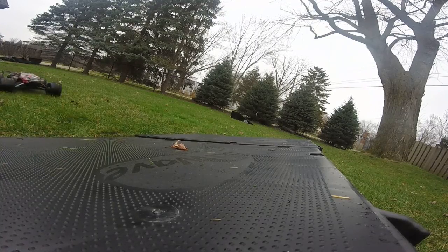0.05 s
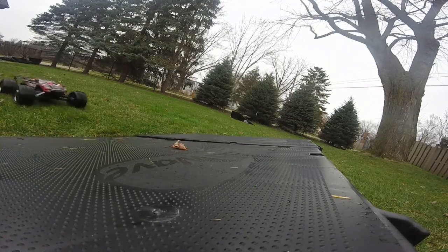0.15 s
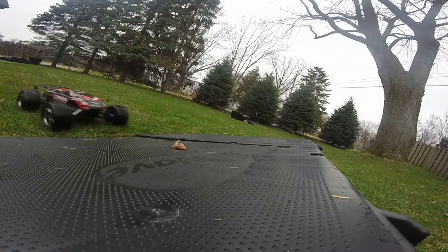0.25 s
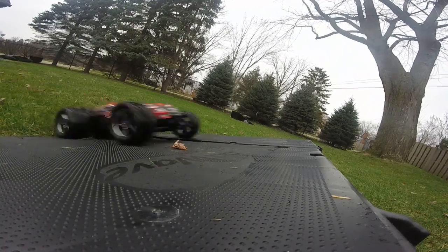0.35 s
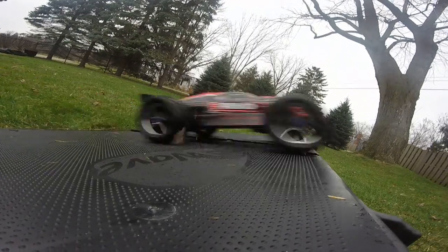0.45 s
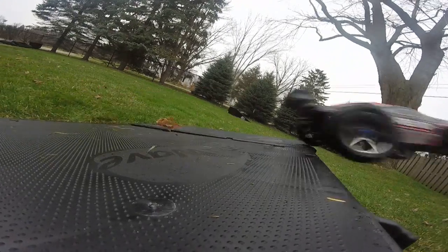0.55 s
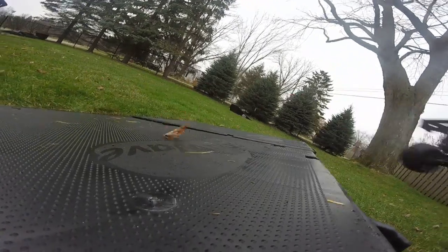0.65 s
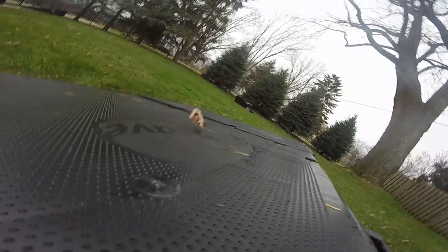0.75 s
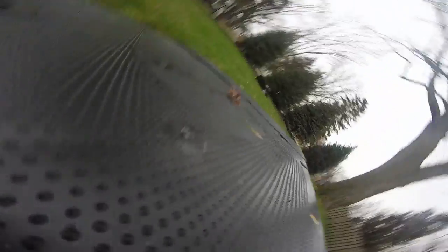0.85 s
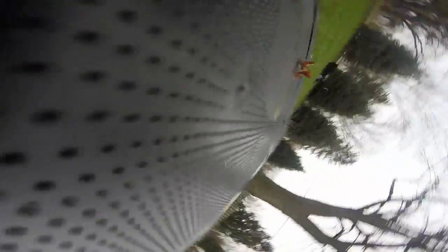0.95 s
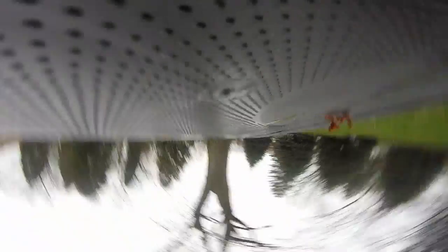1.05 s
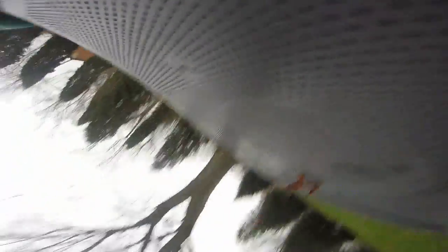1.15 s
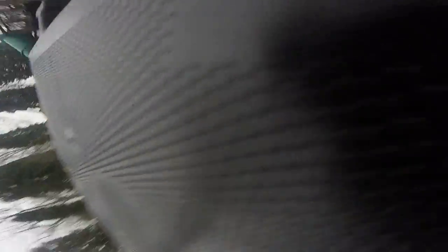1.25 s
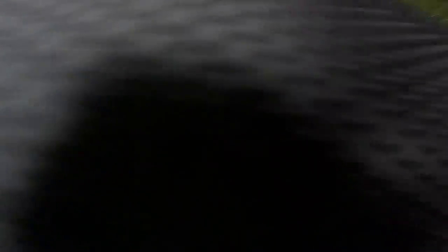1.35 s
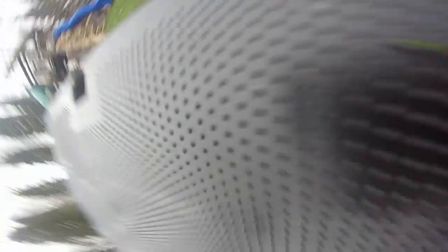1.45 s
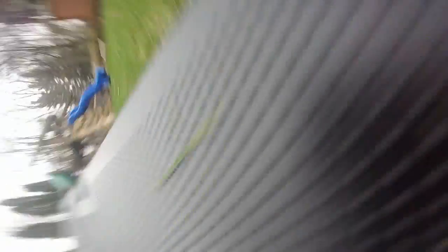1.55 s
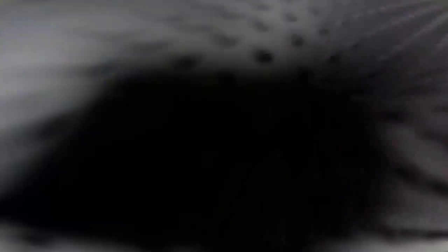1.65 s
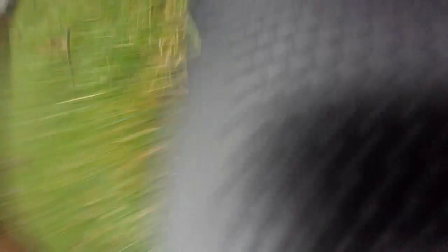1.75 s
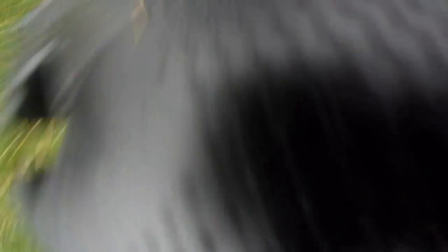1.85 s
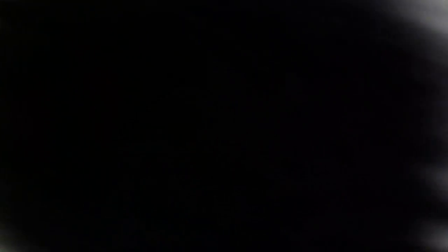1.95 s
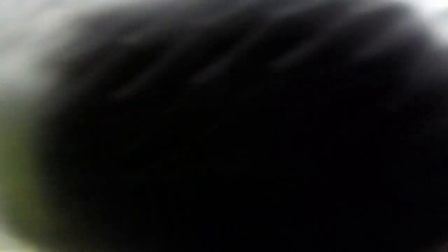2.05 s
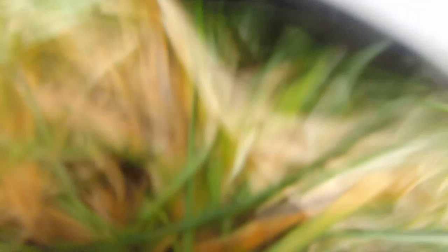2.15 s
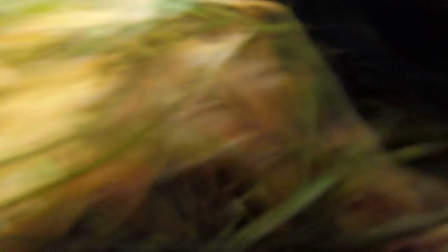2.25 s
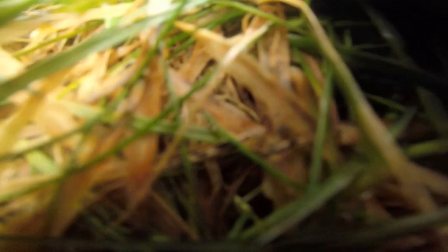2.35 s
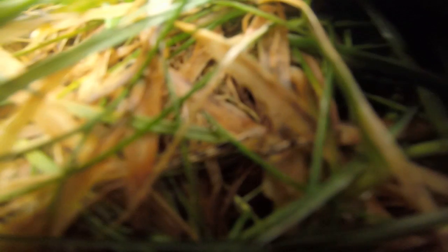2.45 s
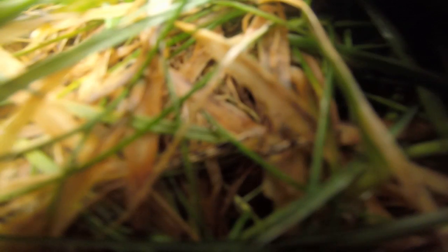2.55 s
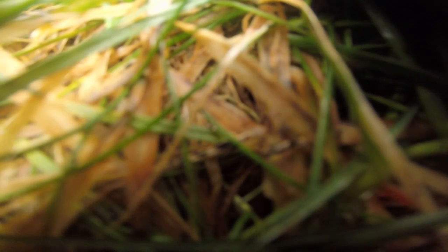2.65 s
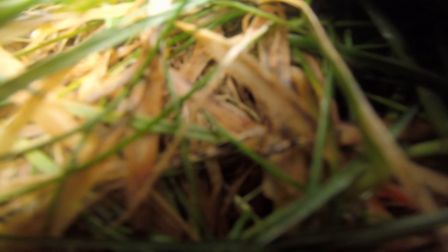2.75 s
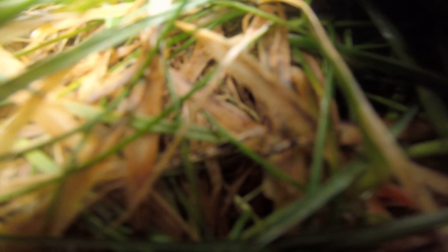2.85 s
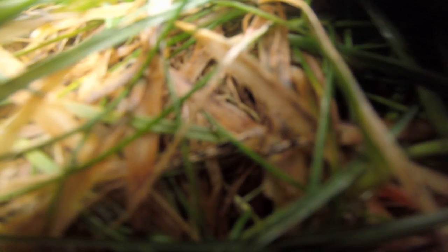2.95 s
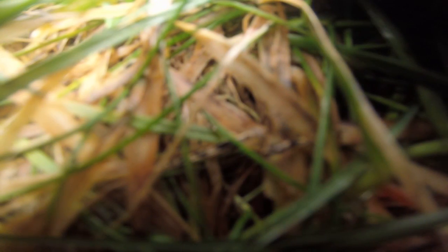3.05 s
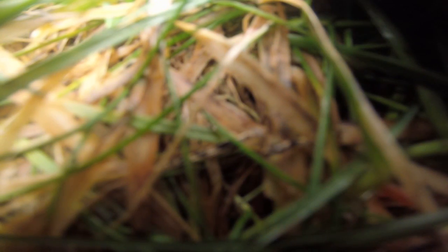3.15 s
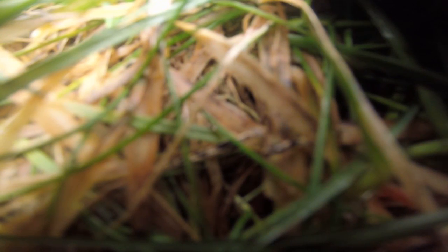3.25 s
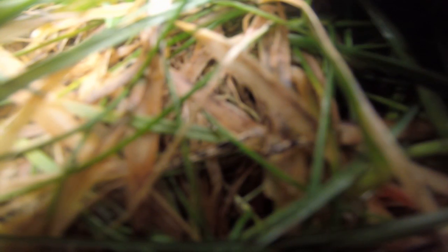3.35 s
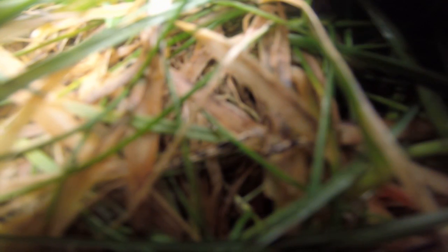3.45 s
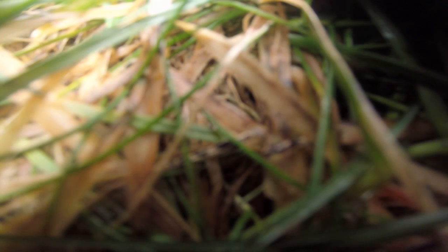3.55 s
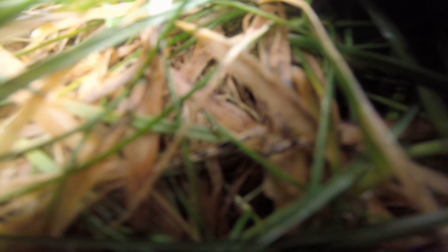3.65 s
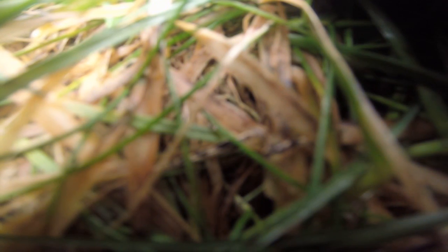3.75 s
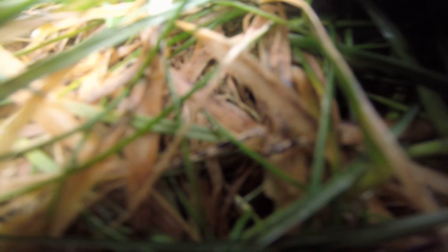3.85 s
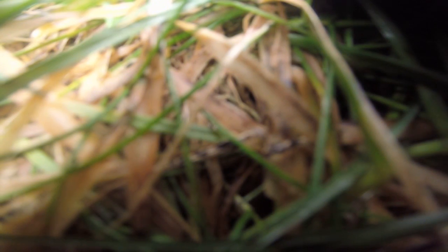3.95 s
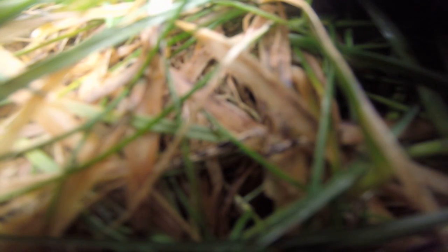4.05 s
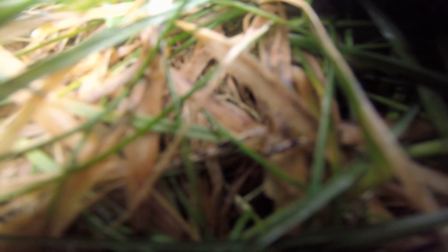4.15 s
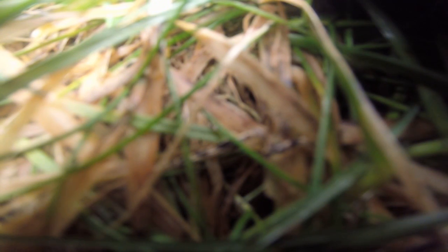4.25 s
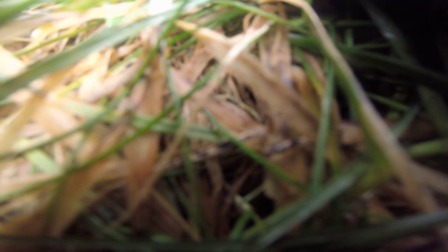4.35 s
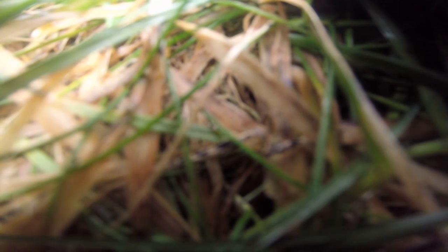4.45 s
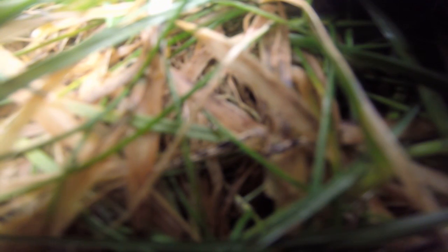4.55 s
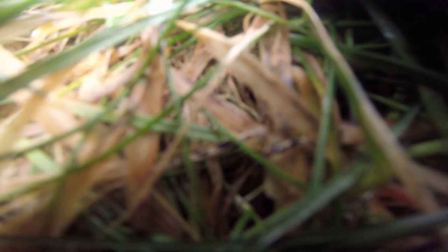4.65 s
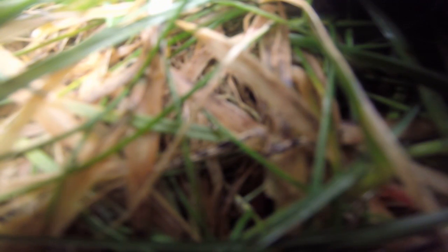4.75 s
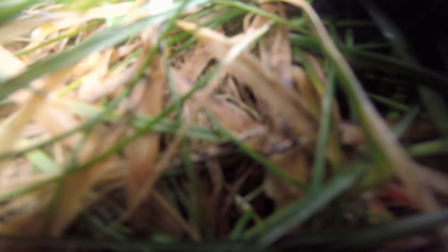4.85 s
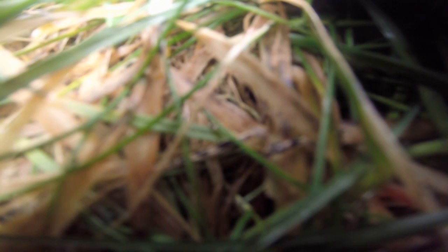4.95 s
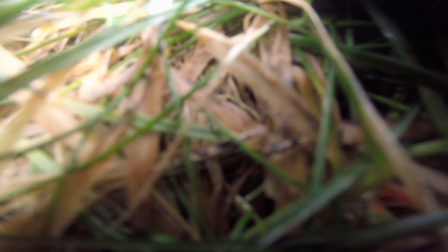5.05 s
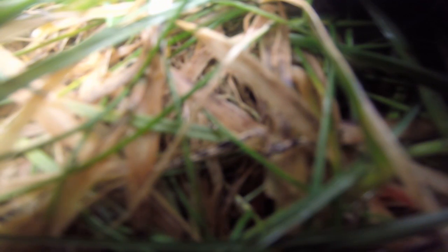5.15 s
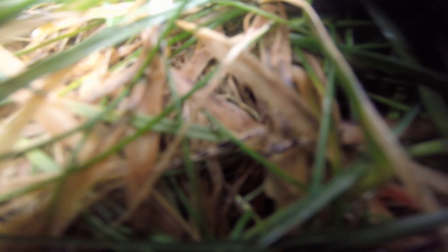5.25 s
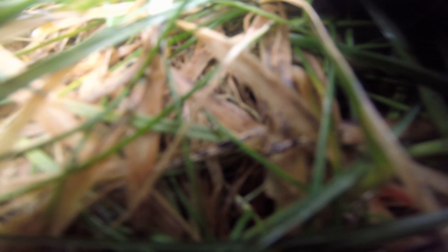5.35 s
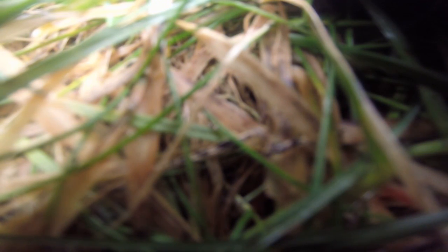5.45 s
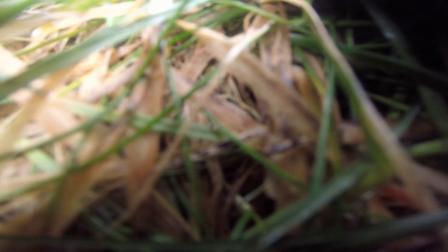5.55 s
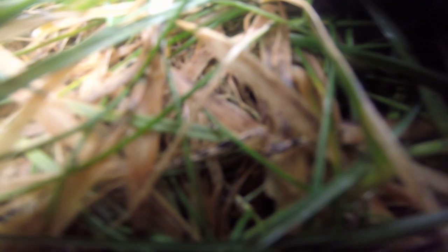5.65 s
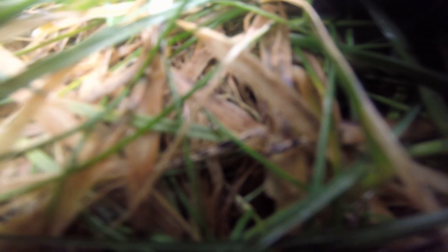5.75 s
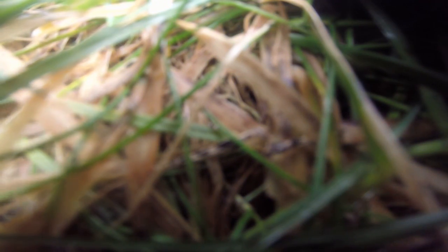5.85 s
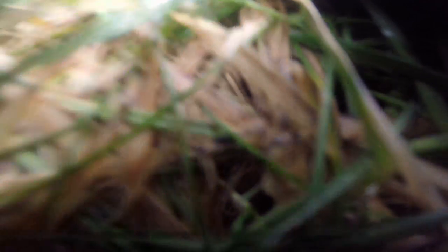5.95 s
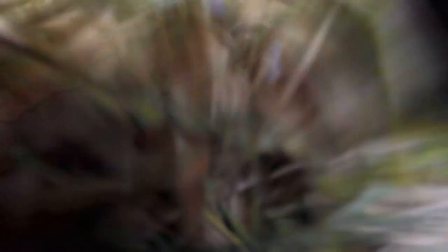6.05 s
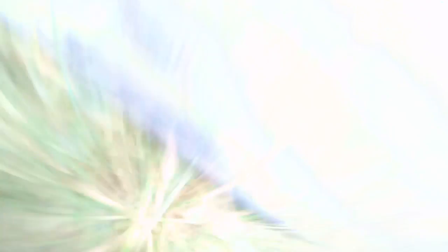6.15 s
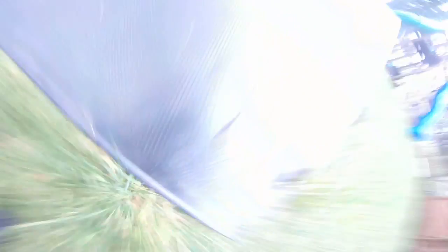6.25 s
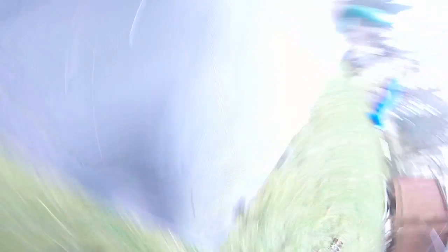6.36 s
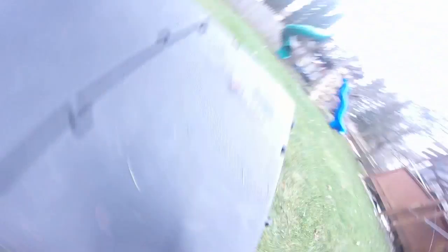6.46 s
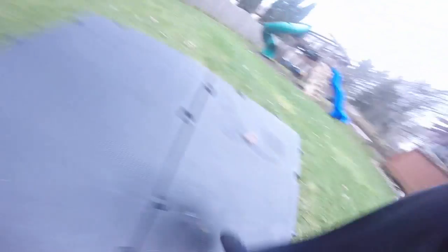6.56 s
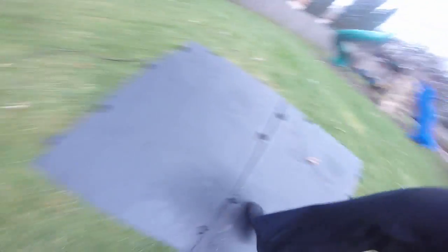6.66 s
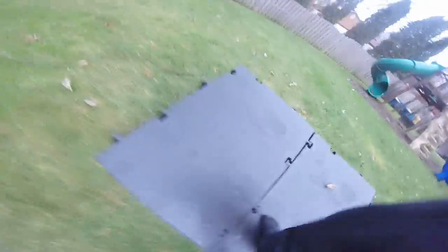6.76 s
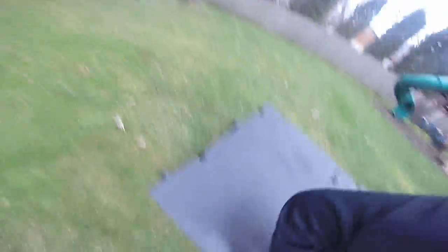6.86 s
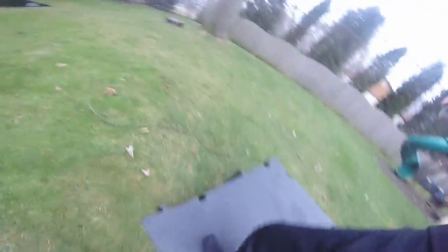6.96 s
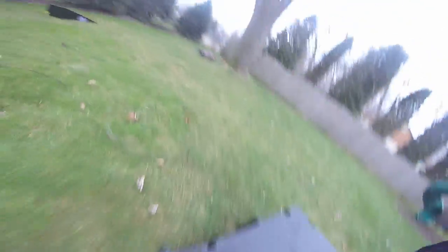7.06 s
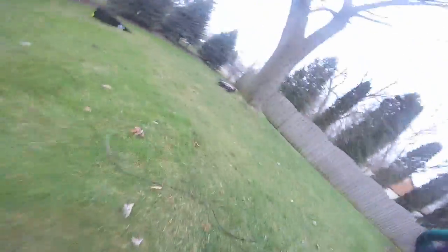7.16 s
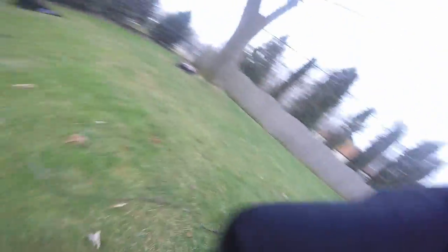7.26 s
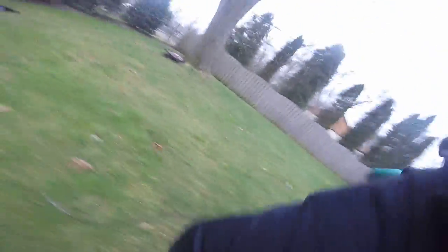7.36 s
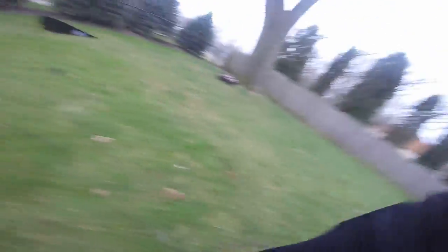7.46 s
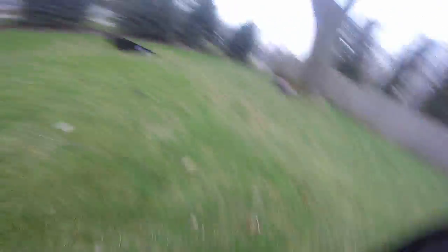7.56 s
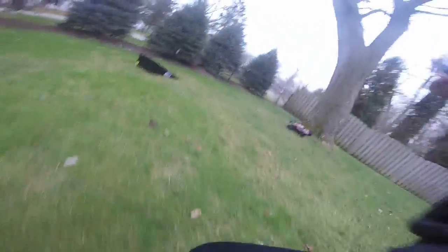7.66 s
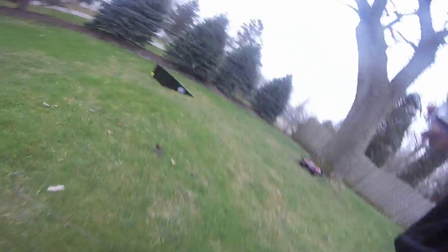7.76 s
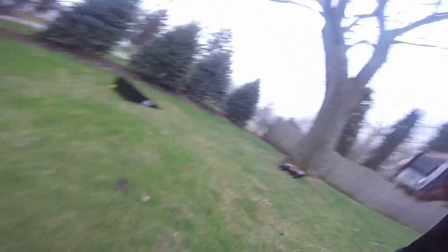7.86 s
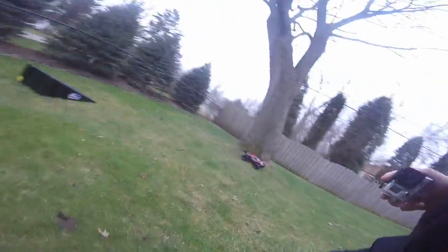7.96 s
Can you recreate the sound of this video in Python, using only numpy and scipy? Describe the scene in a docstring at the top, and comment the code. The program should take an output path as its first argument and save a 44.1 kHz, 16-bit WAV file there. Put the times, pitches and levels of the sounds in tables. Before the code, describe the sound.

Outdoors on a lawn, heard from a microphone inside a small hard case. From 0 s a little electric truck nears, its fuzzy gear whine gliding upward over gritty tyre hiss. At about 0.4-0.5 s wheels and chassis slap a hollow plastic ramp in a rapid cluster of sharp cracks and short booms; the truck rushes past and fades by 0.7 s, with small skips to 0.9. From 1.0 to 2.2 s the case tumbles: dense, extremely loud, clipped plastic knocks with rattles and faint metallic ringing. Grass crunches at 2.2, with last taps and a dull thump by 2.4. From 2.5 to 5.9 s it is very quiet: faint distant whirring, soft hiss, slight low hum. At 6.0-6.3 s grass scrapes, thumps and a brief squeak. Afterwards come light handling bumps, low wind buffets and short motor whines near 7.0 and 7.8, until 8 s.

```python
"""Electric truck, ramp and tumbling camera

A small electric truck whines up a plastic ramp and knocks a little camera loose; the camera tumbles into the
grass, hears the truck roam the lawn, and is pulled out and carried through a light wind.
Hiss, wind and grass are filtered noise or snaps; gear tones are narrow noise bands that glide; blows excite
decaying modes of panel, case and mount. A limiter, clipping and band limits shape the sum."""
import sys
import numpy as np
from scipy import signal
from scipy.fft import rfft, irfft
from scipy.io import wavfile
from scipy.ndimage import uniform_filter1d

SR = 44100
rng = np.random.default_rng(int(sys.argv[2]) if len(sys.argv) > 2 else 0)


def wav_record(signal):
    """Record a signal, one row per channel, as 16-bit PCM in the file named by sys.argv[1]."""
    frames = np.transpose(np.atleast_2d(signal))
    bounded = np.clip(frames, -1, 1)
    # unit amplitude maps onto the largest positive 16-bit level
    quanta = np.round(bounded * 32767).astype(np.int16)
    wavfile.write(sys.argv[1], SR, quanta)


N = 353241

# the truck nearing, rushing up the ramp and away:
# (time [s], tyre and gear level [dB], treble level [dB], drumming of the panel [dB])
PASS_LEVELS = [(0, -45, -48, -44), (.13, -47, -45.5, -40), (.23, -45, -43, -39), (.34, -34, -41, -39),
               (.38, -31, -40, -31), (.52, -32, -52, -26.5), (.57, -28.5, -40.5, -30),
               (.62, -31.5, -44, -25.5), (.68, -37.5, -61, -43), (.74, -47, -68, -54),
               (.8, -47.5, -65, -90), (.99, -46, -57, -90)]
# spectrum of the truck rushing past: (frequency [Hz], relative density [dB per Hz])
NEAR_SPECTRUM = [(470, -34), (800, -11.5), (1390, -7), (2000, -3.5), (2660, -15.5), (3220, -6), (3790, -15),
                 (4400, -12), (10600, -31.5), (13000, -53.5), (16000, -74)]


def gain_of(db):
    """Level to amplitude: 20 dB is a factor of ten."""
    return 10 ** (np.asarray(db) / 20)


def evened(x):
    """Power normalisation: scales to unit rms."""
    return x / np.sqrt(np.mean(x ** 2) + 1e-20)


def peaked(x, db):
    """Peak normalisation: scales the largest excursion to a level."""
    return gain_of(db) * x / abs(x).max()


def add(mix, s, sound):
    """Superposition: lays a sound into the mix at time s."""
    part = mix[round(s * SR):][:len(sound)]
    part += sound[:len(part)]


def follow(rows, column=1):
    """Linear interpolation: one column of a curve at every sample."""
    rows = np.asarray(rows)
    return np.interp(np.arange(N) / SR, rows[:, 0], rows[:, column])


def coloured(x, points, lo_hz=0, hi_hz=SR):
    """Spectral shaping: weights the spectrum of x between two soft edges, at unit rms."""
    hz = np.fft.rfftfreq(len(x), 1 / SR) + 1
    point_hz, point_db = np.transpose(points)
    shape = gain_of(np.interp(np.log(hz), np.log(point_hz), point_db))
    edges = 1 / (1 + (lo_hz / hz) ** 6) / (1 + (hz / hi_hz) ** 6)
    return evened(irfft(rfft(x) * shape * edges, len(x)))


def flutter(db, span_s):
    """Random amplitude modulation: a unit-rms gain that wanders by about db within span_s."""
    hop = 64  # samples a step
    steps = rng.standard_normal(N // hop + 2)
    size = max(int(span_s * SR / hop), 1)
    slow = evened(uniform_filter1d(uniform_filter1d(steps, size), size))
    return evened(gain_of(db * np.interp(np.arange(N) / hop, np.arange(len(slow)), slow)))


def resonate(x, hz, width):
    """Heterodyne resonator: shifts the curve hz down to zero, smooths, and shifts back."""
    turn = np.exp(2j * np.pi * np.cumsum(hz * np.ones(len(x))) / SR)
    r = np.exp(-np.pi * width / SR)
    return 2 * (turn * signal.lfilter([1 - r], [1, -r], x / turn)).real


def ringing(modes, shift_db=0, detune=.0):
    """Modal superposition: decaying sines with chance strengths and signs."""
    hz, db, t60 = np.transpose(modes)[:, :, None]
    luck = rng.standard_normal((len(modes), 3)).T[:, :, None]
    t = np.arange(int(max(t60)[0] * SR)) / SR
    waves = np.sin(2 * np.pi * hz * (1 + detune * luck[0]) * t) * np.sign(luck[1])
    decays = gain_of(db + shift_db + 3.0 * luck[2] - 60 * t / t60)
    return (decays * waves).sum(0)


def chatter(span_s):
    """Contact excitation: a first snap and a few ms of scattered smaller ones."""
    t = np.arange(int(SR * .03)) / SR
    snaps = rng.standard_normal(len(t)) * (rng.random(len(t)) < .12) * np.exp(-t / max(span_s, 1e-4))
    return snaps + .8 * (t == 0)


def bumps(events, widths_s, levels_db):
    """Gaussian envelopes: a gain made of one bell-shaped swell per event."""
    out = np.zeros(N)
    for s, width, db in zip(events, widths_s, levels_db):
        u = np.linspace(-3, 3, int(6 * width * SR))
        add(out, s - 3 * width, gain_of(db) * np.exp(-u ** 2))
    return out


def truck():
    """Broadband rolling noise: tyre and gear hiss; from afar the chassis bands flicker through it."""
    # the truck roaming the lawn: (time [s], tyre and gear level [dB], treble level [dB])
    roaming = [(1.0, -50.5, -73.5), (2.45, -58, -68.5), (3.2, -63, -71), (3.581, -57.5, -66),
               (3.98, -60, -69), (4.29, -57, -61.5), (4.9, -56.5, -61), (5.31, -55.5, -56),
               (5.9, -55, -54.5), (6.3, -62, -60.5), (6.54, -56.5, -60), (6.61, -44, -50),
               (6.66, -54.5, -55.5), (6.83, -48, -55.5), (6.97, -47.5, -51), (7.12, -49, -57.5),
               (7.35, -50.5, -61.5), (7.64, -49, -64), (7.86, -50, -49.5), (8.01, -43.5, -61)]
    # spectrum across the lawn: (frequency [Hz], relative density [dB per Hz])
    far_spectrum = [(470, -23), (800, 0), (1150, -13), (1900, -2), (2840, -12.5), (3380, -11), (6020, -17),
                    (12500, -39.5), (14800, -44.5), (16000, -66.5)]
    # flickering bands of the drive train: (frequency [Hz], width [Hz], relative level [dB])
    chassis = [(1400, 120, -3), (1870, 160, -4), (3380, 390, 1.5), (4070, 210, -7.5), (5220, 69, -9.5),
               (6060, 120, -3.5), (7970, 280, -8)]
    # the wheels skip on touching down: (time [s], level [dB], treble level [dB])
    skips = [(.7, -46, -46.5), (0.789, -41.5, -51), (0.905, -42, -44)]
    split_hz, skip_s = 4500, .023  # skip_s is a half width

    levels = np.vstack([np.array(PASS_LEVELS)[:, :3], roaming])
    noise = rng.standard_normal(N) * flutter(2.0, .01)
    bands = np.zeros(N)
    for hz, band_hz, db in chassis:
        bands += gain_of(db) * flutter(3, .04) * evened(resonate(rng.standard_normal(N), hz, band_hz))
    near = coloured(noise, NEAR_SPECTRUM)
    far = coloured(noise, far_spectrum) + 0.48 * evened(bands)

    def near_then_far(**edge):
        """Band splitting: one side of the split, near in the first second and far after it."""
        flat = [(1, 0)]
        return np.where(np.arange(N) < SR, coloured(near, flat, **edge), coloured(far, flat, **edge))

    low, high = near_then_far(hi_hz=split_hz), near_then_far(lo_hz=split_hz)
    s, level_db, treble_db = np.transpose(skips)
    widths = np.full(len(s), skip_s)
    low_gain = gain_of(follow(levels)) + bumps(s, widths, level_db)
    high_gain = gain_of(follow(levels, column=2)) + bumps(s, widths, treble_db)
    return low_gain * low + high_gain * high


def swell(start, length, first_hz, last_hz, top_db):
    """Power-law glide: rows of a tone that rises and fades while its glide flattens out."""
    end_db, settle = -15, 2.2  # depth at both ends of the swell; how fast the glide flattens
    u = np.linspace(0, 1, num=12)
    hz = last_hz + (first_hz - last_hz) * (1 - u) ** settle
    return np.transpose([start + length * u, hz, top_db + end_db * (2 * u - 1) ** 2])


def gliding_lines(curves, orders, snatched=False):
    """Frequency-modulated narrow-band noise: fuzzy lines at multiples of each gliding reference."""
    out = np.zeros(N)
    for rows in curves:
        s, hz, db = np.transpose(rows)
        t = np.arange(s[0], s[-1], 1 / SR)
        lines = np.zeros(len(t))
        for multiple, width, order_db in orders:
            line = evened(resonate(rng.standard_normal(len(t)), multiple * np.interp(t, s, hz), width))
            lines += gain_of(order_db) * flutter(2.2, 0.017)[:len(t)] * line
        if snatched:
            lines *= flutter(5.5, .02)[:len(t)]  # tufts and dips of the lawn hide it by turns
        add(out, s[0], gain_of(np.interp(t, s, db)) * lines * signal.windows.tukey(len(t), .1))
    return out


def whine():
    """Gear-mesh harmonics: loose gears give fuzzy multiples of the mesh rate, beside other gliding tones."""
    # one table a burst of throttle: (time [s], gear mesh frequency [Hz], reference level [dB])
    throttle = [
        [(0, 3753, -57), (.05, 4050, -58), (.13, 4476, -45), (.2, 5636, -45), (.3, 5934, -44),
         (.4, 6150, -40.5), (.5, 5920, -43), (.57, 5800, -51), (.65, 4900, -55)],
        [(6.88, 2460, -57), (6.94, 3300, -58), (6.99, 3930, -63), (7.03, 3800, -60)],
    ]
    # lines of the gear mesh: (multiple [1], width [Hz], level over reference [dB])
    mesh_orders = [(.76, 160, -6.5), (1, 110, 7), (2, 400, -18)]
    # fuzzy gliding tones of the drive, some near twice the gear mesh:
    # (start [s], length [s], first reference [Hz], last reference [Hz], top reference level [dB])
    drones = [(0, 0.61, 1770, 2140, -37.5), (.005, .17, 7550, 9050, -48.5),
              (0.123, 0.32, 3350, 3480, -41.5), (.22, 0.16, 4270, 4670, -42),
              (0.453, 0.21, 3500, 3250, -39), (0.501, .45, 2125, 2164, -50.5),
              (3.26, 0.58, 1680, 2032, -65), (3.399, 0.32, 3350, 3760, -65), (3.99, 0.69, 1500, 2080, -69),
              (4.595, .72, 3050, 3520, -60), (4.901, 0.98, 1400, 1350, -60), (6.879, .1, 5000, 7700, -48.5),
              (6.913, 0.19, 8160, 7450, -46.5), (6.93, .1, 5940, 6100, -52),
              (6.972, 0.15, 3050, 3450, -40.5), (7.743, 0.16, 1480, 1530, -40),
              (7.828, 0.26, 9270, 7500, -50.5), (7.902, .2, 3980, 3770, -55),
              (7.943, 0.13, 1710, 1500, -39)]
    # a distant run across the lawn: (time [s], gear mesh frequency [Hz], reference level [dB])
    far_run = [(4.7, 4880, -61), (4.94, 4980, -63.5), (5.07, 5100, -56), (5.16, 5280, -66),
               (5.4, 5000, -57.5), (5.56, 5220, -64), (5.7, 5200, -63)]
    # grass scraping on the case as it comes free: (time [s], reference [Hz], reference level [dB])
    scrape = [(6.02, 2000, -37), (6.035, 2200, -29.5), (6.055, 2100, -36), (6.08, 2190, -32.5),
              (6.105, 2200, -34)]
    # then squeaking on it: (time [s], reference [Hz], reference level [dB])
    squeak = [(6.255, 760, -44), (6.275, 730, -33.5), (6.29, 733, -43), (6.31, 710, -62)]

    # orders below: (multiple [1], width [Hz], level over reference [dB])
    out = gliding_lines(throttle, mesh_orders)
    out += gliding_lines([swell(*row) for row in drones], [(0.98, 99.9, 1), (1.06, 300., -9.5)])
    out += gliding_lines([far_run], [(.81, 120.5, 2.5), (1, 90., 3.5)], snatched=True)
    out += gliding_lines([scrape], [(.68, 150., -7), (1, 200., 6), (1.47, 200., -4)])
    squeak_orders = [(0.98, 60., 1.5), (1.55, 120., -4.5), (2.9, 120., -20.5), (3.8, 120., -19)]
    return out + gliding_lines([squeak], squeak_orders)


def ramp():
    """Plate and cavity resonance: the panel drums under the tyres and barks when a wheel slams its edge."""
    # spectrum of the drumming: (frequency [Hz], relative density [dB per Hz])
    drum_spectrum = [(15, -50.5), (25, -7.5), (113, -3.5), (167, -9.5), (262, -6.5), (309, -13),
                     (515, -4.5), (919, -16), (1300, -14.5), (1690, -39), (2860, -120)]
    # wheels and chassis striking the ramp:
    # (time [s], panel peak [dB], pitch [Hz], ring t60 [s], boom peak [dB])
    blows = [(.391, -12, 1770, .015, -15), (.399, -6.5, 700, 0.0098, -9), (.414, -1.5, 3440, 0.0075, -17),
             (.421, -11, 2610, 0.0079, -11), (.459, -7.5, 1900, 0.0052, -11),
             (.468, -19.5, 2110, .01, -14.5), (0.478, -10, 3550, 0.017, -19), (.485, -1, 1050, .03, -22),
             (.494, -9.5, 2040, .02, -22), (.504, -18, 3000, .012, -23)]
    # hollow under the panel: (frequency [Hz], relative level [dB], t60 [s])
    boom = [(60, -6.0, 0.082), (131.3, -0.5, 0.04), (210.7, 1.5, 0.03), (328, 1.5, 0.019)]

    drumming = coloured(rng.standard_normal(N), drum_spectrum) * flutter(0.85, .01)
    out = gain_of(follow(PASS_LEVELS, column=3)) * drumming
    t = np.arange(SR // 20) / SR
    for s, db, hz, t60, boom_db in blows:
        panel = [(hz, 0, t60), (1.7 * hz, -8., .008), (1.95 * hz, -11., .01), (3.1 * hz, -24., .008)]
        contact = chatter(.0045)
        add(out, s, peaked(signal.fftconvolve(contact, ringing(panel)), min(db, -1)))
        add(out, s, peaked(signal.fftconvolve(contact, ringing(boom)), boom_db))
        shell = coloured(rng.standard_normal(len(t)), NEAR_SPECTRUM)
        add(out, s, gain_of(db - 12.5 - 60 * t / 0.055) * shell)  # clatter of the shell
    return out


def knocks():
    """Impact excitation of modes: a blow snaps the case, rattles loose parts and sets the mount singing."""
    # knocks on the camera case, hard in the tumble, light in the hand: (time [s], peak before limiting [dB],
    # body relative to middle [dB], treble relative to middle [dB], pitch of the spot [Hz],
    # rattle relative to knock [dB])
    blows = [(.999, 23.5, -11.5, -21, 920, -42.5), (1.021, 6, -2, -3, 1030, -30.5),
             (1.037, 8, -5, -9, 996, -40.5), (1.043, 12, 4, -34, 1400, -26), (1.065, 9, 7, -26, 1880, -34),
             (1.073, 19, -11.5, -2.5, 1950, -34.5), (1.134, 7, -7, -14, 1920, -36),
             (1.144, 9.5, -9.5, -12, 1590, -46.5), (1.173, 4, -9, -23, 1950, -34.5),
             (1.187, 20.5, -7.5, -4, 2460, -49), (1.267, 19.5, -13.5, -9, 2150, -46),
             (1.288, 15.5, -10.5, -13, 1170, -43.5), (1.385, 18, -17, -10.5, 1500, -31),
             (1.405, 27, -7, -11.5, 1900, -50), (1.419, 15.5, -1, -6, 1670, -41),
             (1.475, 21.5, -7, -28, 2100, -35.5), (1.496, 22.5, -7, -9.5, 902, -37),
             (1.519, 21.5, -4, -14.5, 1670, -59), (1.53, 22, -11.5, -20.5, 1150, -40.5),
             (1.642, 23.5, -6.5, -11.5, 1740, -49.5), (1.686, 24, -14, -18.5, 1000, -41),
             (1.766, 20.5, -10.5, -14.5, 2300, -39), (1.778, 24, 3.5, -14, 988, -39),
             (1.785, 21, -7, -12.5, 2020, -45.5), (1.803, 20, -11, -14, 1700, -38),
             (1.868, 26.5, -11.5, -21, 1010, -37), (1.909, 30.5, -1.5, -5, 1560, -45),
             (1.932, 22, -4.5, -3, 1700, -37.5), (1.941, 23.5, -10, -9, 2540, -39.5),
             (1.945, 24.5, -14, -16.5, 1090, -39.5), (1.965, 24, -5, -16, 1090, -30.5),
             (1.992, 18.5, -15, -31, 1600, -45), (2.002, 21, -4, -18.5, 1130, -35),
             (2.018, 27.5, -1.5, -13.5, 942, -37.5), (2.028, 2, -5, -23, 2130, -36),
             (2.066, 14.5, -1, -10.5, 902, -46), (2.073, 22.5, 0, -16.5, 964, -31.5),
             (2.082, 25, -7, -18, 1960, -32), (2.112, 20, -8, -17, 977, -45),
             (2.132, 17.5, -4, -20, 902, -36.5), (2.142, 16, 1, -10, 902, -40),
             (2.149, 12, -19, -15, 1030, -35), (2.158, 20.5, -8, -21.5, 1150, -34),
             (2.172, 20, -6, -17, 902, -55), (2.184, 15, -12, -13, 1010, -44.5),
             (2.194, 11, -4, -5.5, 2200, -49.5), (2.237, 12, -35, -1, 3400, -37.5),
             (2.317, 11.5, -11.5, -11, 3540, -28.5), (2.337, 6.5, -7, -5, 1990, -39.5),
             (2.353, -5.5, -21, -4, 1890, -41), (2.375, 2.5, -6.5, -8.5, 2560, -42.5),
             (2.39, -4.5, -6, -10, 1930, -47), (6.03, -12.5, -26, -1, 2160, -47),
             (6.038, -19, -26, -3, 2320, -45), (6.11, -4, -9, -7, 780, -37),
             (6.789, -16.5, -16, -7, 2000, -45), (6.809, -41, 5, 0.5, 689, -40),
             (6.842, -14.5, 0.5, -1, 600, -49), (6.855, -22, -15, 1, 1630, -40),
             (7.127, -22, 6, -30, 656, -26), (7.364, -26, -8, 10, 729, -36),
             (7.438, -19, -16, 17, 700, -24.5), (7.554, -24.5, -12, 1, 600, -51),
             (7.616, -10, -33, -9.5, 3430, -35), (7.829, -13, -21, -4, 2050, -44)]
    # plastic case modes: (nominal frequency [Hz], relative level [dB], t60 [s])
    case = np.array([(170, -15.5, 0.072), (300, -9, 0.0087), (559.6, 4.5, 0.041), (700, 7.5, 0.028),
                     (1050, -2, 0.015), (1500, -2.5, 0.013), (1900, -3, 0.017), (2366, -3, 0.0098),
                     (3000, -0.5, 0.0078), (3550, -3, 0.011), (3970, -7.5, 0.0046), (4950, 3.5, 0.0073),
                     (5770, 5, 0.0062), (6880, 4.5, 0.0052), (8500, -3.5, 0.0034), (10500, -17, 0.0023),
                     (13200, -25, .006)])
    # metal mount modes: (frequency [Hz], relative level [dB], t60 [s])
    mount = [(520, -5.5, .2), (730, -3.5, .25), (1870, -2, 0.33), (1885, -4, 0.25), (2700, -12.5, .22),
             (2955, -9.5, 0.24), (3050, -14, 0.18)]
    # spectrum of the rattle: (frequency [Hz], relative density [dB per Hz])
    rattle_spectrum = [(59, -42.5), (100, -13.5), (608, -1.5), (991, -19), (1870, -7.5), (2320, -19.5),
                       (2930, -20), (8110, -24), (16000, -51)]
    mount_db = -41.5  # shift of the mount's modes relative to the knock
    contact_s, contact_growth = .0011, .24  # typical at a 0 dB knock; dB longer for each dB harder

    out, t = np.zeros(N), np.arange(SR // 5) / SR
    body, middle, treble = (case[(case[:, 0] > lo) & (case[:, 0] <= hi)]
                            for lo, hi in ((0, 900), (900, 4500), (4500, SR)))
    shaken = gain_of(-60 * t / 0.25) + 2.3 * gain_of(-60 * t / .035)  # slower settling and quick shiver
    fade = np.cos(np.pi / 2 * t / t[-1])
    for s, db, body_db, treble_db, spot_hz, rattle_db in blows:
        luck = np.exp(0.44 * rng.standard_normal())
        contact = chatter(contact_s * gain_of(contact_growth * db) * luck)
        snap = np.zeros(SR // 5)
        for modes, part_db in ((body, body_db), (middle, 0), (treble, treble_db)):
            octaves = np.log2(modes[:, :1] / spot_hz)
            near_db = 8.8 * np.exp(-(octaves / 0.58) ** 2)  # the spot struck favours modes near its pitch
            rings = ringing(modes, near_db, detune=.04)
            neighbours = ringing(modes, near_db - 2.0, detune=.13)  # each mode has a neighbour
            add(snap, 0, peaked(signal.fftconvolve(contact, rings + neighbours), part_db))
        add(out, s, peaked(snap, db))
        add(out, s, gain_of(db + mount_db) * ringing(mount))
        rattle = coloured(rng.standard_normal(len(t)), rattle_spectrum)
        add(out, s, gain_of(db + rattle_db) * rattle * shaken * fade)
    return out


def thumps():
    """Damped oscillation: a soft push gives a low swing with a rounded start."""
    # dull thumps through the case: (time [s], peak [dB], pitch [Hz], t60 [s])
    pushes = [(0.954, -34, 40.4, 0.053), (2.318, 1.5, 122.5, 0.044), (2.339, -10.5, 67, 0.21),
              (5.964, -14, 81.5, 0.091), (6.107, -12, 112, 0.042), (6.333, -34.5, 280, 0.15),
              (6.443, -24, 40, 0.07), (6.738, -12.5, 46, 0.051), (6.783, -13.5, 68.4, 0.063),
              (6.84, -17, 252, 0.02), (7.124, -15, 43.4, 0.16), (7.626, -19, 194, 0.15)]
    out, t = np.zeros(N), np.arange(SR // 4) / SR
    for s, db, hz, t60 in pushes:
        swing = np.sin(2 * np.pi * hz * t) * gain_of(-60 * t / t60)
        rounded_start = 1 - np.exp(-t / 0.0016)
        add(out, s, peaked(swing * rounded_start, db))
    return out


def grass():
    """Friction as impulse noise: dense tiny snaps of blades slipping over the case."""
    # one table a drag of grass over the case: (time [s], level [dB], treble relative to it [dB])
    drags = [
        [(2.19, -18, -14), (2.218, -10.5, -11.5), (2.242, -4.5, -30), (2.252, -32, -16), (2.3, -30, -11)],
        [(5.85, -69, 13), (5.93, -53, 9.5), (6.002, -48, 1), (6.03, -24, -5.5), (6.096, -36, 5),
         (6.11, -19, -12), (6.128, -49.5, 0), (6.17, -46, -9), (6.185, -39.5, -6), (6.26, -38.5, -13),
         (6.282, -43.5, -37), (6.3, -70, -11)],
    ]
    # spectrum of the snaps: (frequency [Hz], relative density [dB per Hz])
    grass_spectrum = [(290, -47), (500, -13.5), (1230, -2), (3290, -1), (4870, -13.5), (5550, -5.5),
                      (13800, -27.5), (15300, -31), (16000, -55)]

    out = np.zeros(N)
    strengths = rng.standard_normal(N) * gain_of(2.4 * rng.exponential(1, N))
    snaps = strengths * (rng.random(N) < .15) * flutter(3.0, .006)
    low = coloured(snaps, grass_spectrum, hi_hz=4150)
    high = coloured(snaps, grass_spectrum, lo_hz=4060)
    for rows in drags:
        ends = [(rows[0][0] - .02, -110, 0), *rows, (rows[-1][0] + 0.028, -110, 0)]
        out += gain_of(follow(ends)) * (low + gain_of(follow(ends, column=2)) * high)
    return out


def wind():
    """Turbulent pressure noise: lumpy rumble and a rush that swells with the buffets, over a faint hum."""
    # the steady breeze at the microphone: (time [s], rumble level [dB], rush level [dB])
    breeze = [(.72, -50, -55), (.84, -48, -57), (.98, -54.5, -55), (3.4, -43.5, -47), (4.6, -44, -46),
              (5.85, -40, -44), (6.0, -42, -48.5), (6.25, -52.5, -62), (6.5, -42, -41.5), (6.72, -35, -41),
              (7.08, -37.5, -39.5), (7.25, -35, -45), (7.58, -34.5, -45), (7.75, -25.5, -30),
              (8.01, -37, -39.5)]
    # spectrum of the wind: (frequency [Hz], relative density [dB per Hz])
    wind_spectrum = [(8.8, -42), (15, -0.5), (70, 2), (102, -1.5), (145, -1), (179, -4.5), (602, -16),
                     (944, -29.5), (1600, -32), (2080, -49.5), (3520, -120)]
    # buffets of air on the moving case: (time [s], half width [s], rumble level [dB], rush level [dB])
    buffets = [(.94, .015, -39, -56), (4.9, 0.025, -46, -53), (5.974, .018, -27, -32.5),
               (6.04, 0.024, -28.5, -44), (6.11, 0.022, -29, -51), (6.35, .04, -53.5, -62),
               (6.455, 0.017, -32, -48), (6.67, 0.055, -40, -45), (6.799, 0.017, -20, -33),
               (6.851, 0.019, -31, -27), (6.92, 0.047, -31, -42), (7.149, 0.02, -20.5, -37),
               (7.32, 0.047, -35, -38), (7.42, 0.03, -31.5, -40.5), (7.49, 0.032, -25.5, -39.5),
               (7.662, 0.03, -28.5, -27), (7.84, 0.038, -35, -45), (7.96, 0.029, -26, -37.5)]
    # a faint hum: (time [s], peak level [dB])
    hum_levels = [(3.7, -72.5), (3.95, -46.5), (5.7, -51), (5.95, -65)]
    hum_hz, split_hz = 149, 150  # the hum wanders around hum_hz

    s, width, rumble_db, rush_db = np.transpose(buffets)
    rumble = coloured(rng.standard_normal(N), wind_spectrum, hi_hz=split_hz) * flutter(1.5, 0.025)
    rush = coloured(rng.standard_normal(N), wind_spectrum, lo_hz=split_hz) * flutter(1.1, 0.017)
    hum_phase = 2 * np.pi * np.cumsum(hum_hz * flutter(.06, .1)) / SR
    hum = gain_of(follow(hum_levels)) * np.sin(hum_phase)
    rumble_gain = gain_of(follow(breeze)) + bumps(s, width, rumble_db)
    rush_gain = gain_of(follow(breeze, column=2)) + bumps(s, width, rush_db)
    return rumble_gain * rumble + rush_gain * rush + hum


def scene():
    """Linear superposition: all sources at the one microphone."""
    return (truck() + whine() + ramp() + knocks() + thumps() + grass() + wind())[None]


def record(dry):
    """Peak limiting and band limiting: overload drops the gain, which creeps back; sharpest peaks clip."""
    recovery = np.arange(N) * 21.6 / SR  # 21.6 dB a second
    level_db = 20 * np.log10(abs(dry[0]) + 1e-9)
    held_db = np.maximum.accumulate(level_db + recovery) - recovery
    limited = np.clip(dry / gain_of(np.maximum(held_db - 2.5, 0)), -1, 1)  # 2.5 dB over full scale is let by
    limited = signal.lfilter(*signal.butter(1, 25., "high", fs=SR), limited)  # no lasting offset passes
    dulled = signal.lfilter(*signal.butter(4, 14500., fs=SR), limited)  # the microphone's top end
    band_limit = signal.firwin(511, 16450, window=("kaiser", 9), fs=SR)  # edge in Hz
    return np.clip(signal.oaconvolve(dulled, band_limit[None], "same"), -1, 1)


dry = scene()
out = record(dry)
wav_record(out)
```